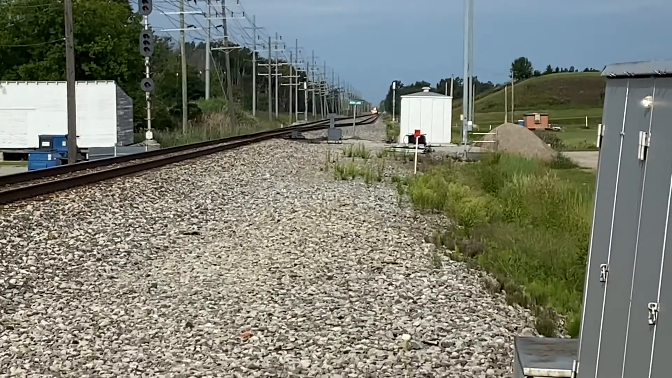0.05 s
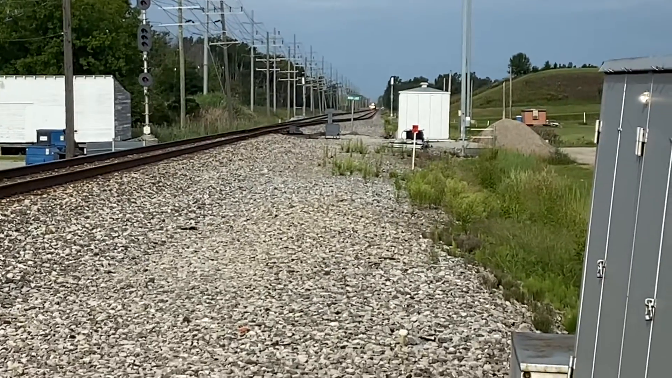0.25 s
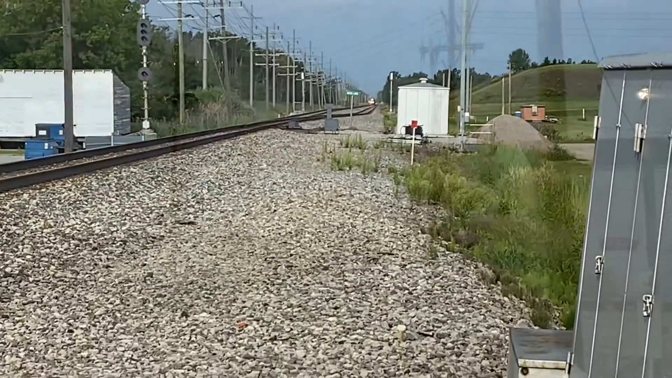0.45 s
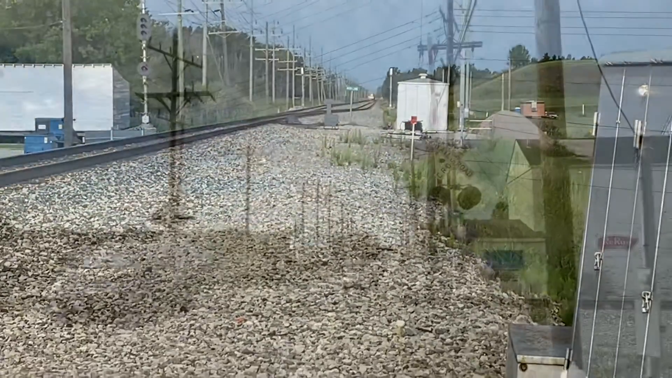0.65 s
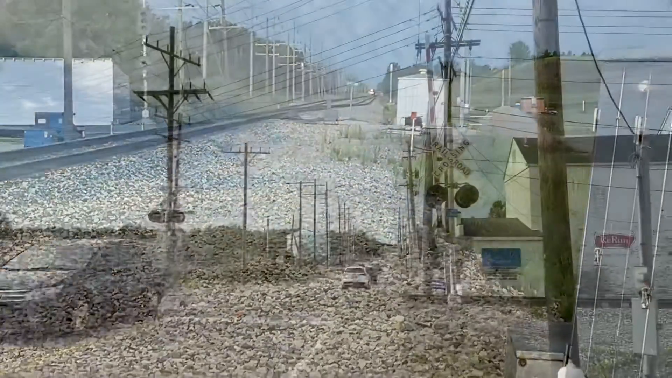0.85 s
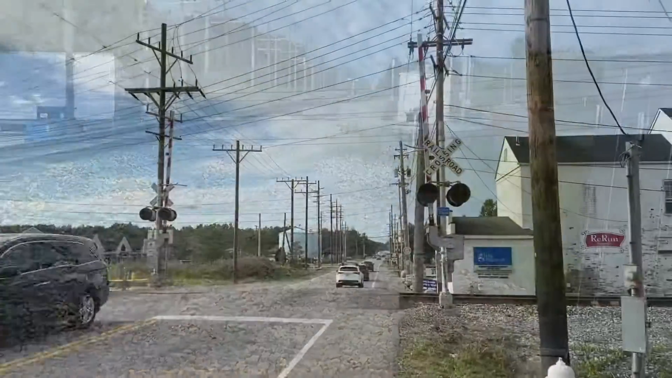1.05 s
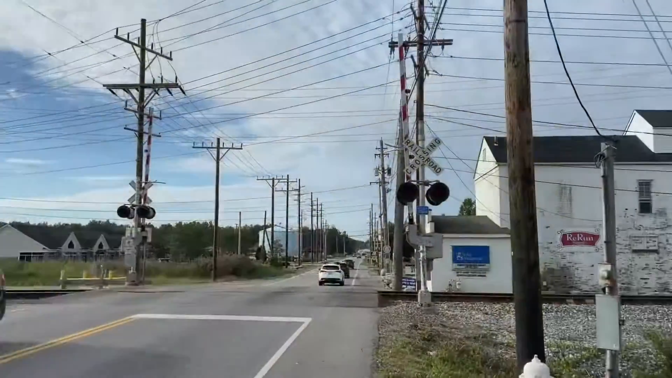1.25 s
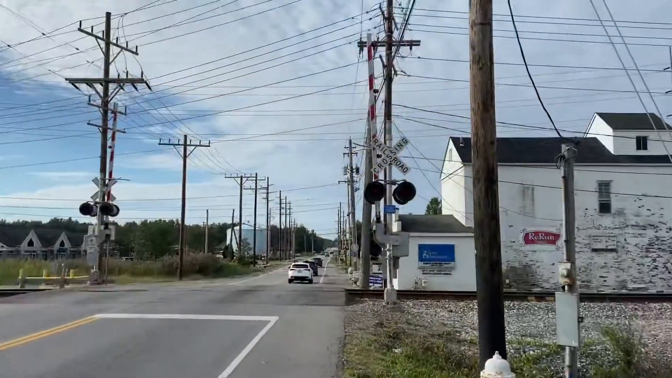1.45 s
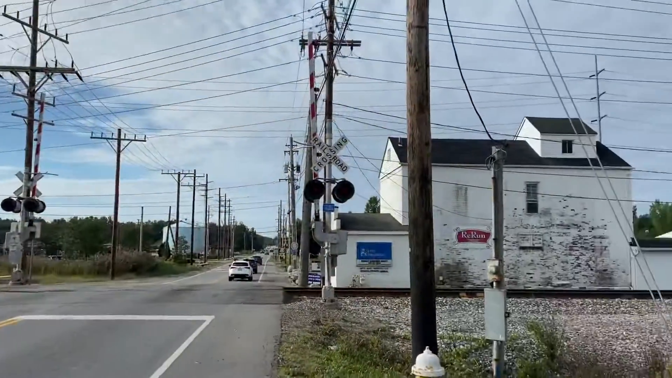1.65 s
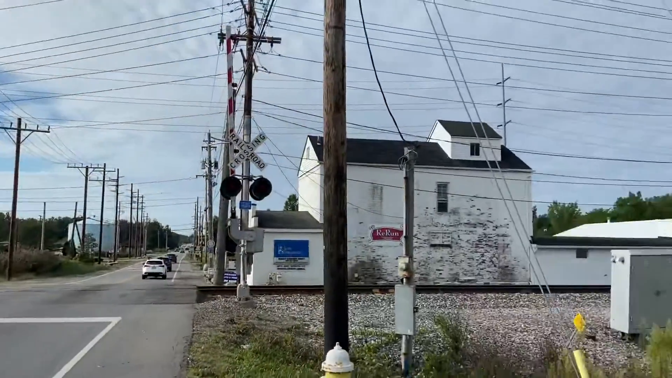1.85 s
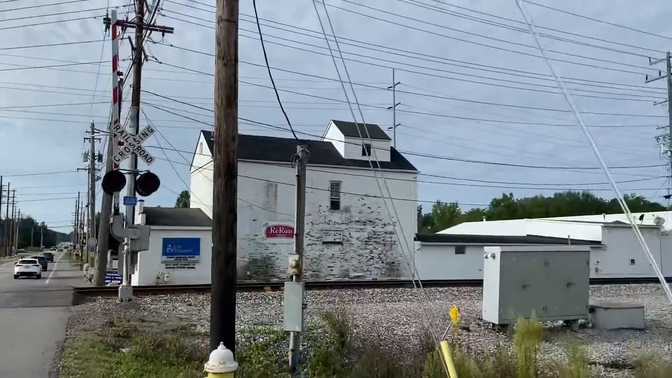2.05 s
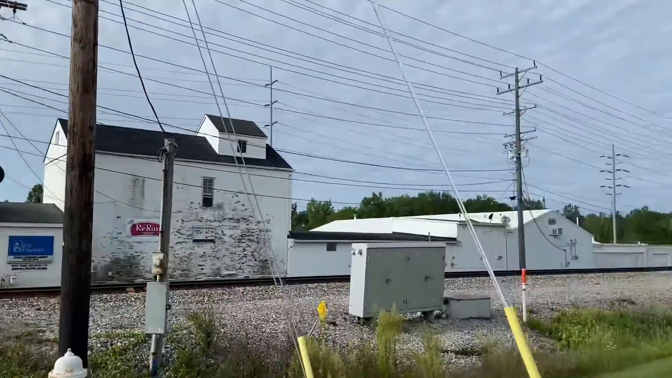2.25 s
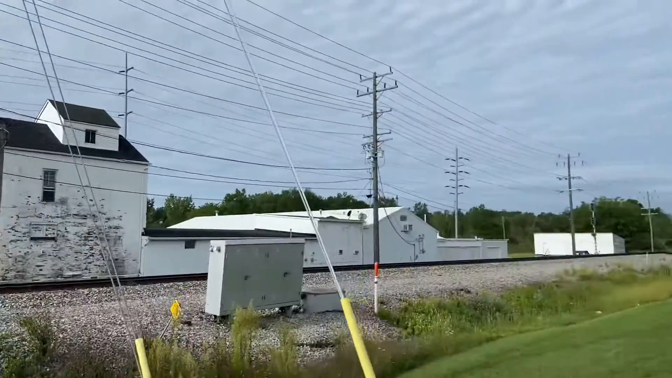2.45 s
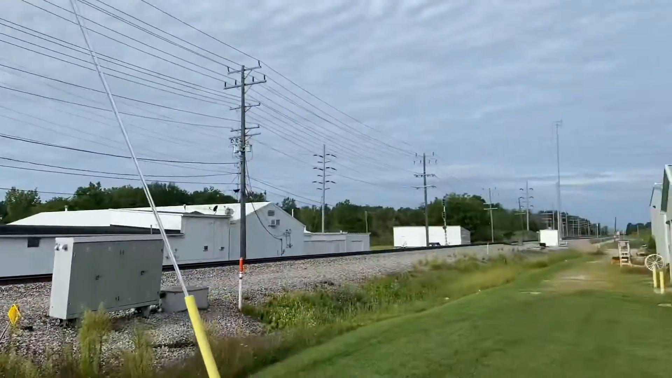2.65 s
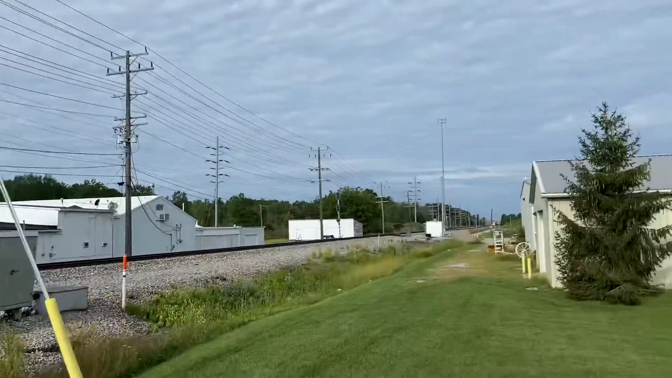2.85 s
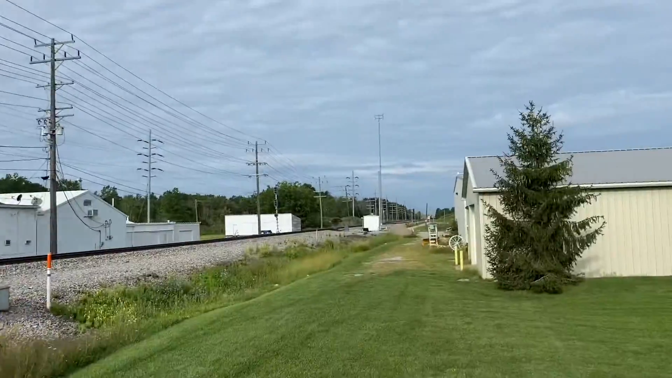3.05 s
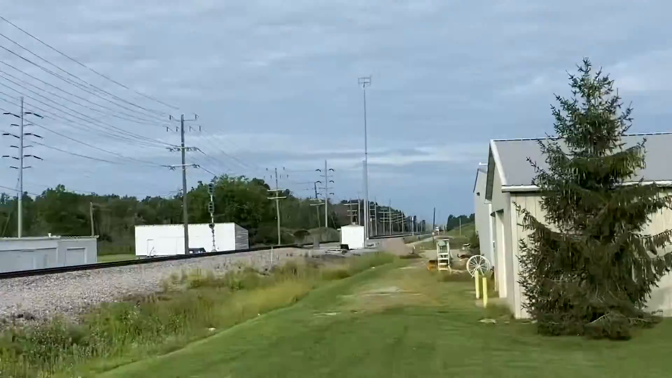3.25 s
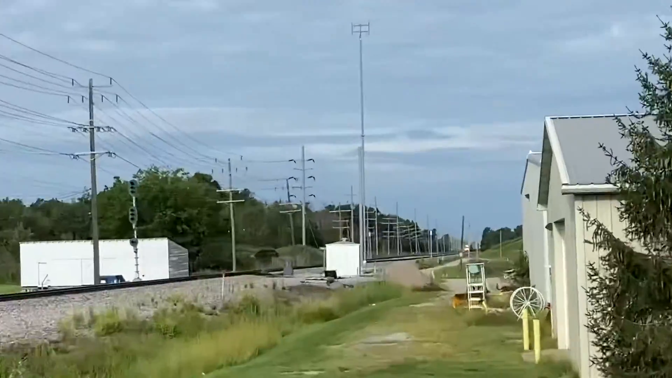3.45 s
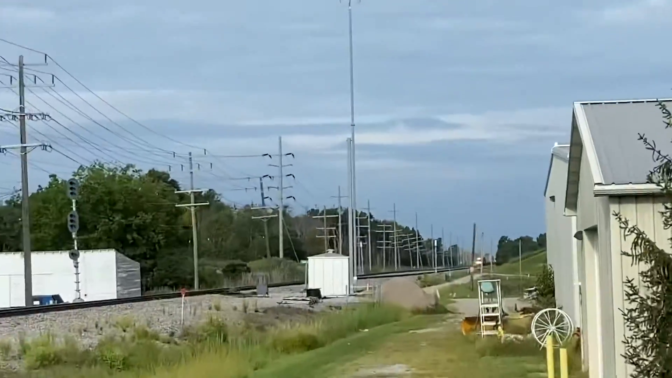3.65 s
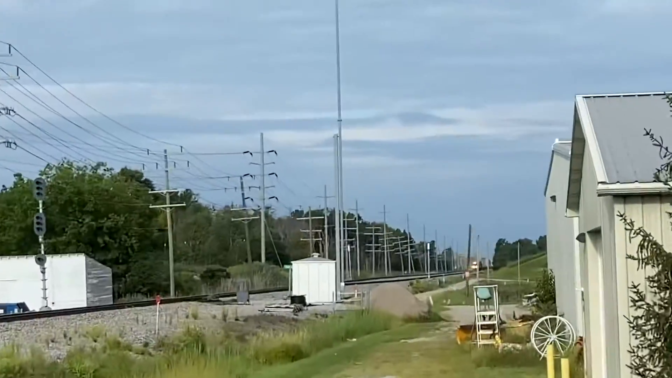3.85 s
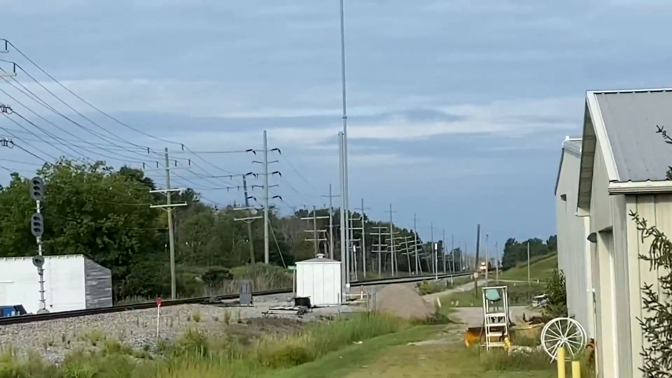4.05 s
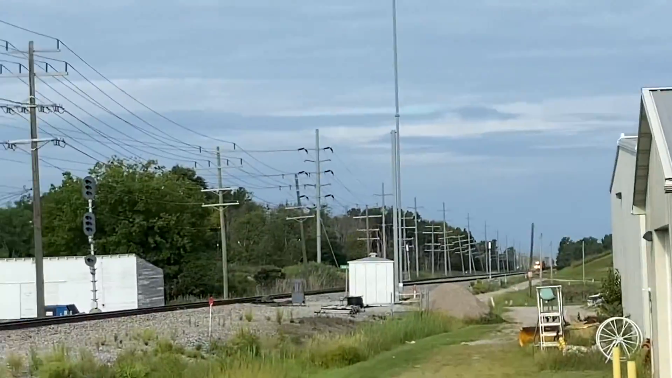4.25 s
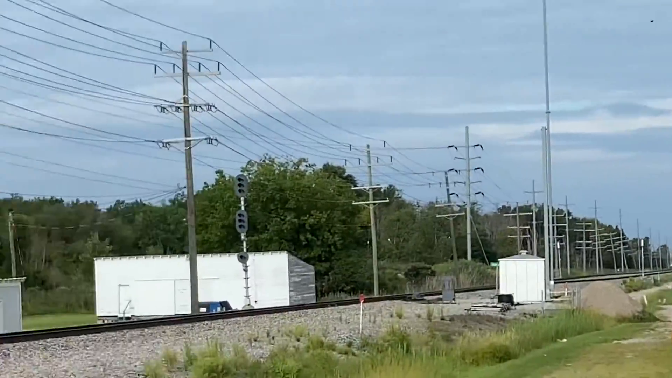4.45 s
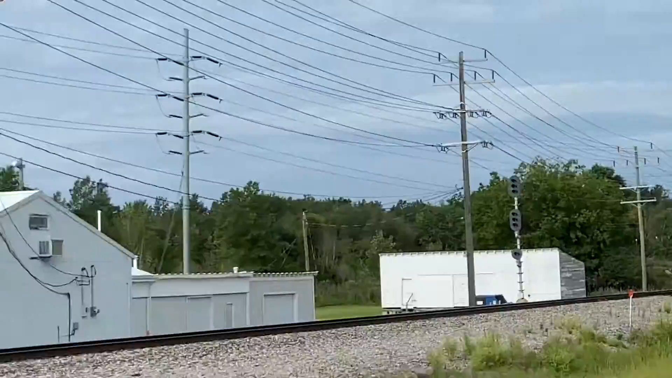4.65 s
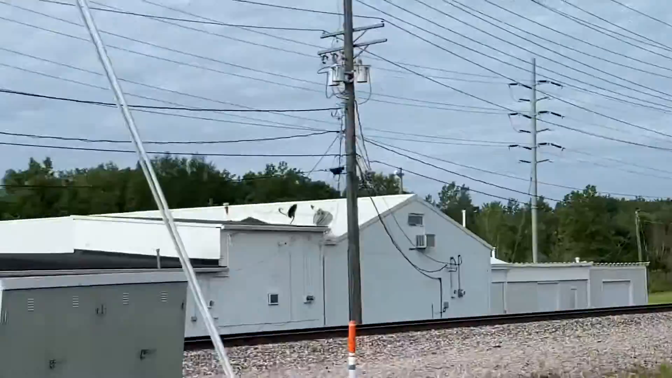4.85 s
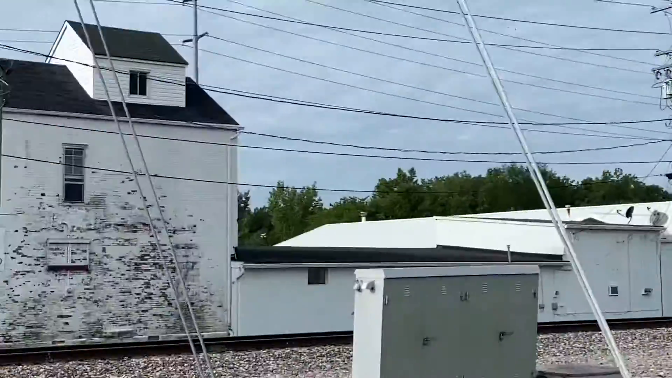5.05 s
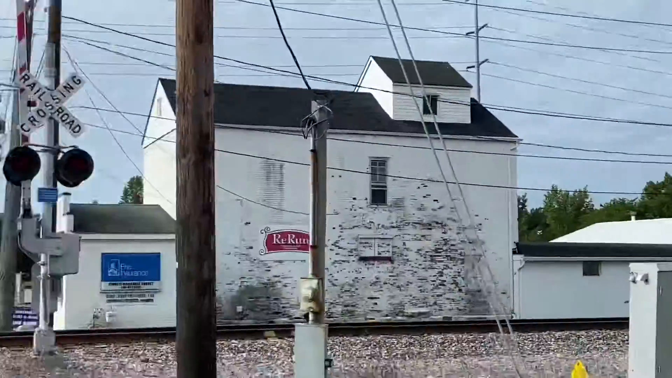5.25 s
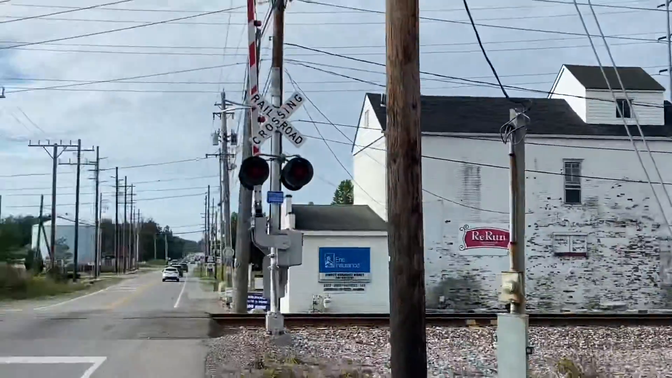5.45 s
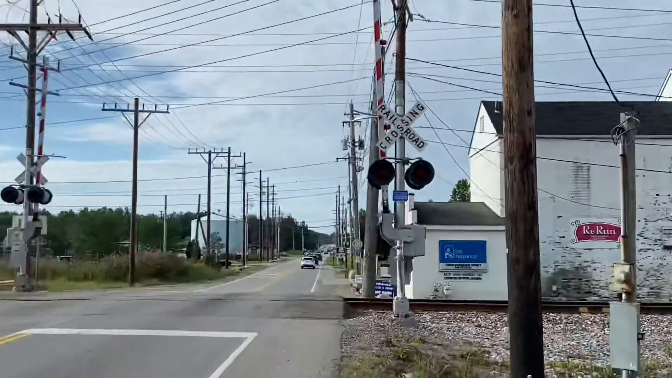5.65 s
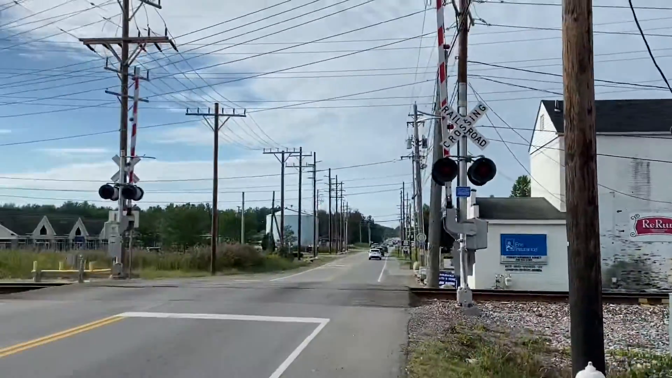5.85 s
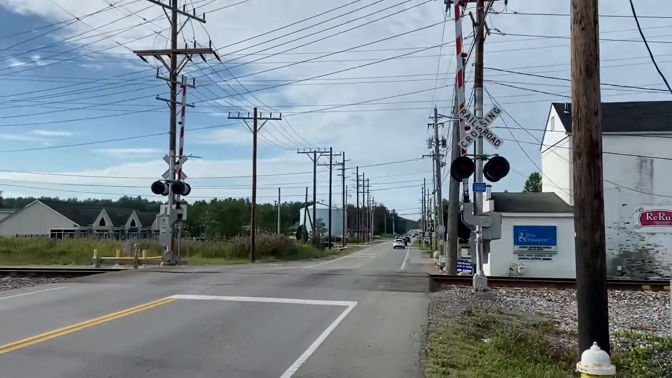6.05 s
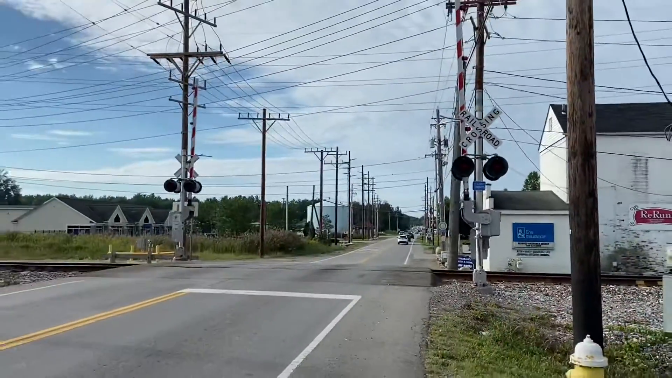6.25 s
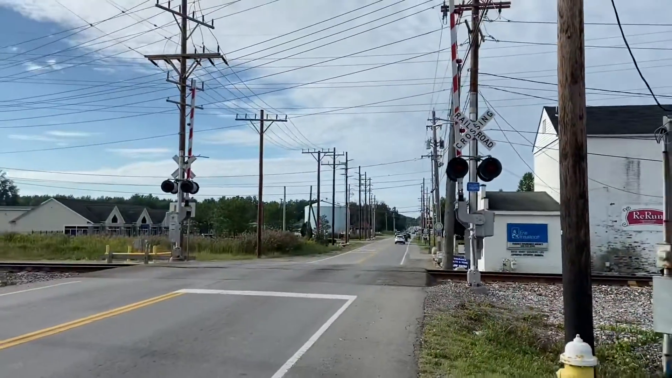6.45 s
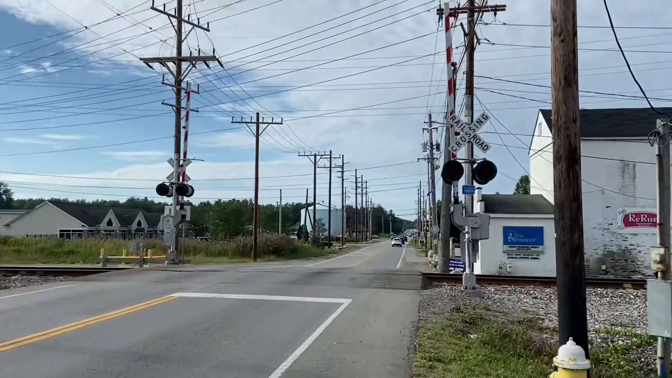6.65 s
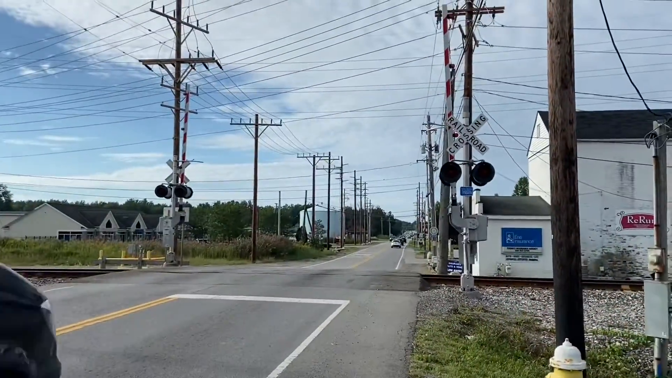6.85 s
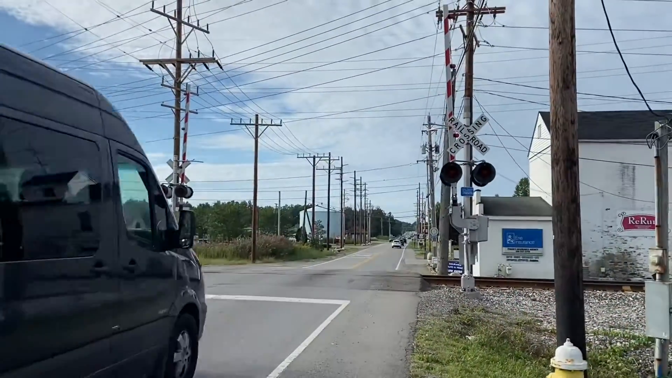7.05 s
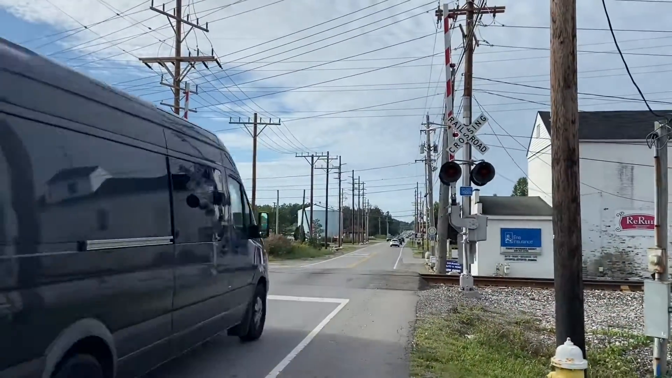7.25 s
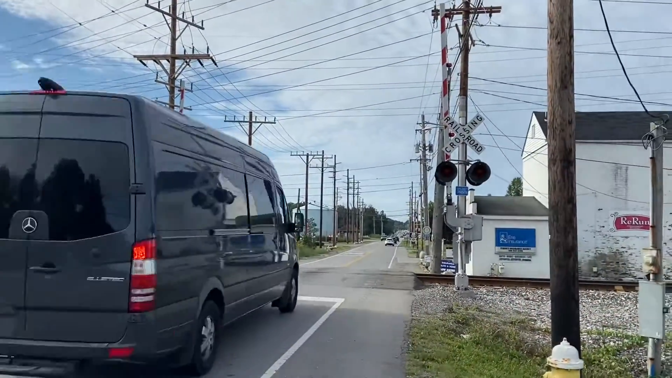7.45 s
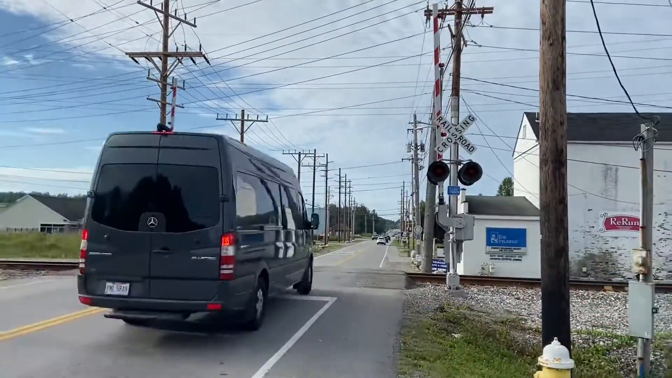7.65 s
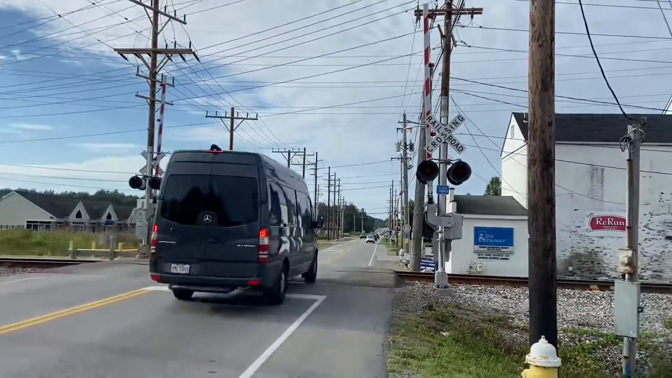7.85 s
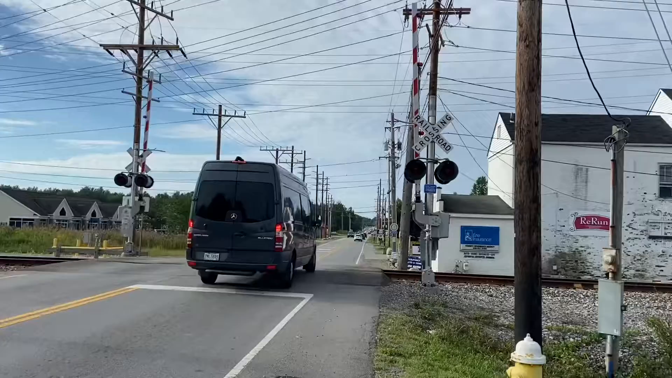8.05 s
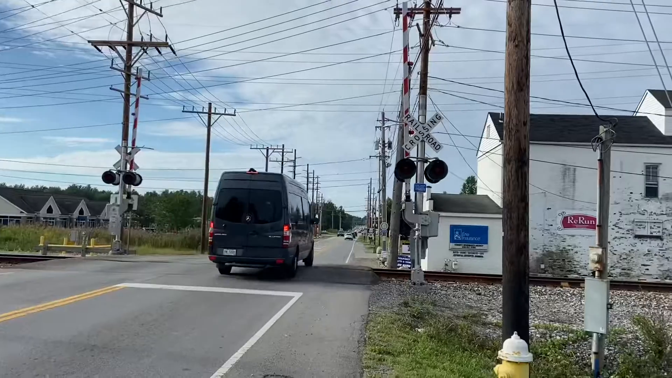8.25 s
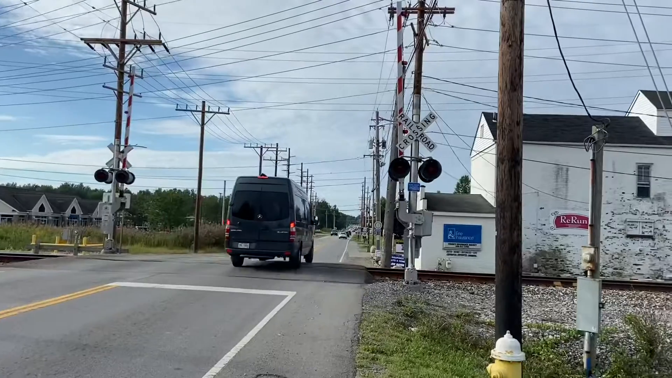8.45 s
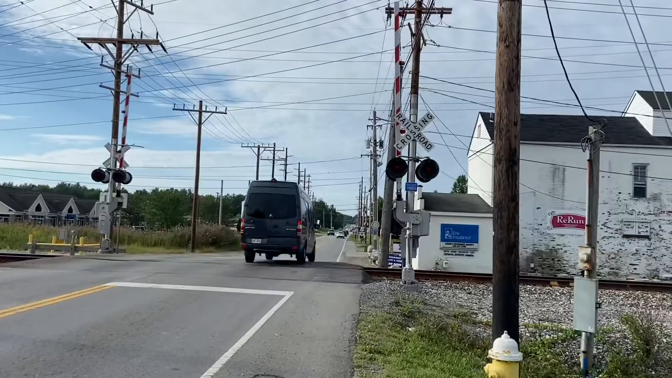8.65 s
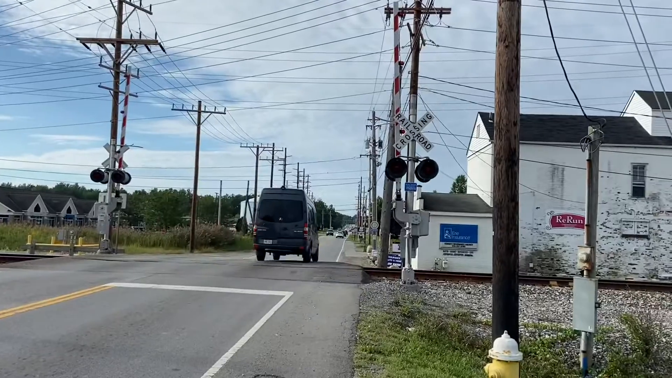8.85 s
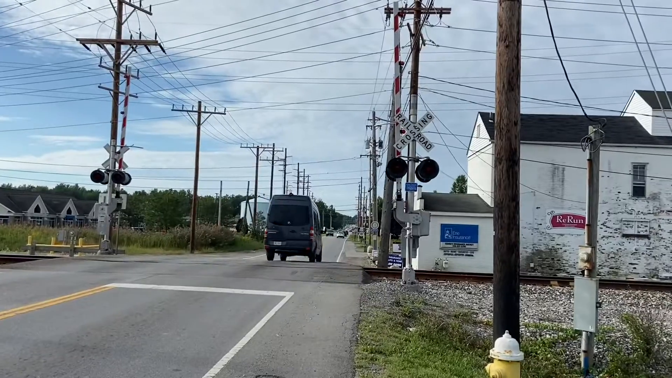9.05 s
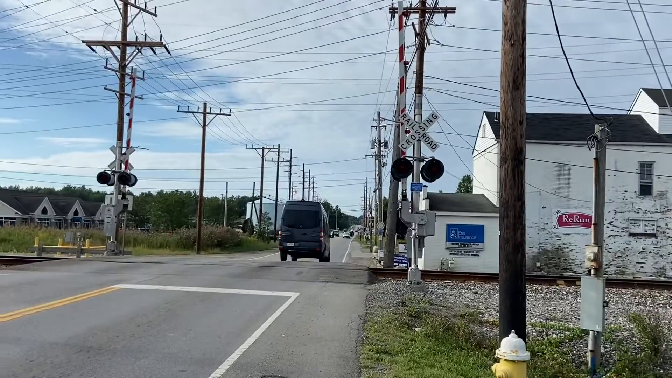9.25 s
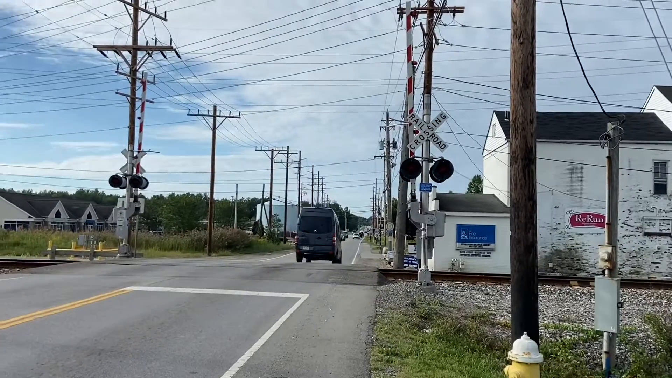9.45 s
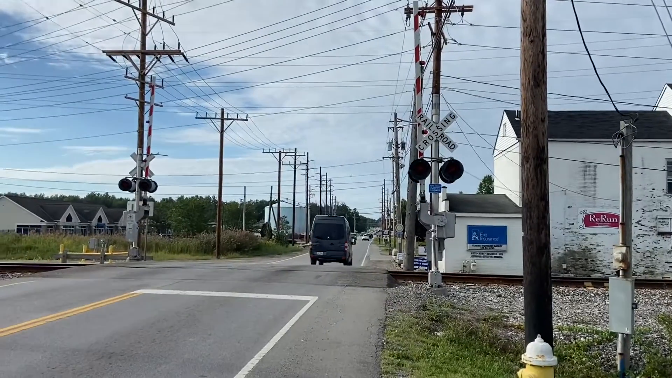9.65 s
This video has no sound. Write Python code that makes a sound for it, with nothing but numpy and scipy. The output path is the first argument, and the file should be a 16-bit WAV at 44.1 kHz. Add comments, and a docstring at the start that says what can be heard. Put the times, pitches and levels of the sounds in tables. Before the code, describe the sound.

Open roadside at a railway level crossing, heard through a hand-held stereo phone. In the first 0.5 s, short low wind puffs thud on the microphone over a bright fluttering grass hiss that soon dies. A car's tyre roar and low engine hum pass nearest around 1.5 s, with grit pops at 1.3, then fade. Distant traffic washes softly beneath. A bush cricket rasps from 2.2 to 3.3 s, louder on the left; a brief rough scuff comes near 2.8. Thin crickets chirp from 3.9 to 6.3 s, with a small stone knock at 4.5. A van's tread hum grows, roaring closest at 6.8 s with hard stone snaps; a wind puff and metallic clinks follow near 7.2. Its axles hit the rails at 8.2-8.4 and, harder, 8.6-8.8 s, with hollow panel thumps, rattling chassis and clinks. Faint crickets return as another car approaches toward the end.

```python
"""Beside a railway level crossing, a car and then a van roll past a hand-held phone; another car nears. Tyres
are coloured noise that sweeps across the two microphone ports; engines are low humming tones. The van's two
axles thump over both rails, ringing the panels and shaking loose metal. Around them: distant traffic, a gust on
the microphone, a bright hiss at the start, insects, a scuff, grit and stones."""
import sys
import numpy as np
from scipy import signal
from scipy.fft import rfft, irfft
from scipy.io import wavfile
from scipy.ndimage import uniform_filter1d, map_coordinates

SR = 44100
rng = np.random.default_rng(int(sys.argv[2]) if len(sys.argv) > 2 else 0)


def unload_audio(sound):
    """Save the sound as a 16-bit wav file, at the path given as the first command line argument."""
    columns = np.transpose(np.atleast_2d(sound))
    # keep every value between -1 and 1, then stretch to whole-number steps
    steps = np.round(np.clip(columns, -1, 1) * 32767)
    wavfile.write(sys.argv[1], SR, steps.astype(np.int16))


N = 428211
FRAME = 1024  # samples in one short spectrum; neighbours overlap by half
HOP = FRAME // 2
TIME = np.arange(N) / SR
HZ = np.maximum(np.fft.rfftfreq(FRAME, 1 / SR), 1)[:, None]
FRAME_S = np.arange(N // HOP + 2) * HOP / SR


def undb(db):
    """Turn decibels into gain."""
    return np.exp(np.asarray(db) * (np.log(10) / 20))


def curves(table, t):
    """Join the columns of a table by straight lines in time."""
    s, *columns = np.transpose(table)
    return [np.interp(t, s, c) for c in columns]


def across(table, hz):
    """Read a (pitch, value) table on a log-frequency axis."""
    f, value = np.transpose(table)
    return np.interp(np.log(hz), np.log(f), value)


def grain(shape):
    """White noise as short spectra: frequency by time."""
    return rng.standard_normal((shape[0], 2 * shape[1]), dtype=np.float32).view(np.complex64)


def sound(spectra):
    """Overlap short spectra into a waveform whose power is the sum of the squared bin gains."""
    window = np.sin(np.pi * (np.arange(FRAME) + .5) / FRAME)
    frames = irfft(spectra.T, FRAME) * (window * FRAME / 2)
    return (frames[:-1, HOP:] + frames[1:, :HOP]).ravel()[:N]


def noise(tone, size):
    """Noise of a given colour, rms 1."""
    colour = undb(across(tone, np.fft.rfftfreq(size, 1 / SR) + 1))
    x = irfft(rfft(rng.standard_normal(size)) * colour, size)
    return x / x.std()


def ring(hz, width, t60, snap=0, top_hz=15000):
    """A snap and a dying noise burst through one resonance with a soft top; width in octaves, peak 1."""
    size, lead = 2 ** 13, 2 ** 7
    dying = rng.standard_normal(size - lead) * undb(-60 * TIME[:size - lead] / t60)
    burst = np.r_[np.zeros(lead), dying]
    burst[lead] += snap
    f = np.fft.rfftfreq(size, 1 / SR) + 1
    quality = 1 / (width * np.log(2))
    soft = (1 + 1j * f / top_hz) ** 4
    resonance = (1 + 1j * quality * (f / hz - hz / f)) ** 2
    x = irfft(rfft(burst) / soft / resonance, size)[lead:]
    return x / np.abs(x).max()


def walk(rate):
    """A smooth random curve with a spread near 1, taking about this many new values per second."""
    k = max(int(SR / rate), 2)
    steps = np.repeat(rng.standard_normal(N // k + 1), k)
    return 1.224 * uniform_filter1d(steps, k)[:N]


def add(out, s, x):
    """Mix a sound in at a time in seconds."""
    i = int(s * SR)
    out[..., i:i + x.shape[-1]] += x[..., :N - i]


def swells(table, tone):
    """Bell-shaped bursts of coloured noise."""
    out, t = np.zeros(N), TIME[:SR]
    for s, db, length in table:
        start = max(s - .5, 0)
        bell = np.exp(-.5 * np.minimum(((start + t - s) / length) ** 2, 10 ** 2))
        add(out, start, noise(tone, len(t)) * undb(db) * bell)
    return out


def ports(gain, likeness, phase, pan_db):
    """Noise at two ports: a shared part shifted in phase between them, and a scattered part for each."""
    c = np.clip(likeness, 0, 1)
    shared, own, phase = np.float32(np.sqrt(c)), np.float32(np.sqrt(1 - c)), np.float32(phase)
    direct = shared * grain(gain.shape)
    left = direct * (np.cos(phase) + 1j * np.sin(phase)) + own * grain(gain.shape)
    right = direct + own * grain(gain.shape)
    left_share = 1 / (1 + undb(-2 * pan_db))  # of the total power
    left_gain = np.float32(gain * np.sqrt(2 * left_share))
    right_gain = np.float32(gain * np.sqrt(2 - 2 * left_share))
    return np.array([sound(left * left_gain), sound(right * right_gain)])


def tyre_gain(rumble, roar, hiss, tone):
    """Carcass rumble, tread roar and air hiss share one colour and blend into each other."""
    colour = undb(across(tone, HZ))
    bands = [(130, 400), (500, 1500), (2500, 7000)]  # Hz
    low, mid, high = (10 * np.log10(np.sum(colour[(HZ > a) & (HZ < b)] ** 2)) for a, b in bands)
    below = across([(300, 0.92), (650, 0.02)], HZ)
    above = across([(1300, 0.013), (2900, 1.0)], HZ)
    between = 1 - below - above
    return colour * undb(below * (rumble - low) + above * (hiss - high) + between * (roar - mid))


# how strongly and how finely tyre noise shifts in colour with the patches of road
FLICKER_DB, FLICKER_PER_S, FLICKER_PER_OCTAVE = 0.9, 8, 5


def flicker():
    """Gains that let each narrow band swell and sink on its own, frequency by time."""
    place = np.broadcast_arrays(np.log2(HZ) * FLICKER_PER_OCTAVE, FRAME_S * FLICKER_PER_S)
    chance = rng.standard_normal(size=(64, 128))
    return undb(FLICKER_DB * map_coordinates(chance, place, order=1, mode="mirror"))


# parts of the engine hum: (multiple of the firing pitch [ratio], level [dB])
ENGINE_ORDERS = [(.5, -9), (1, 1), (1.5, -21), (2, -14.5), (2.5, -20), (3, -15.5)]


def engine(hz, level_db, waver=0.00786):
    """The firing of the cylinders hums at multiples of one pitch, each a little unsteady."""
    turn = 2 * np.pi * np.cumsum(hz * (1 + waver * walk(14))) / SR
    hum = sum(undb(d + 2.6 * walk(9)) * np.sin(np.float32(k * turn)) for k, d in ENGINE_ORDERS)
    return undb(level_db) * hum


# colour of the distant traffic: (pitch [Hz], level [dB])
FAR_TONE = [(22, -17), (55, 4.5), (120, -5), (250, -9), (480, -10), (620, -10.5), (850, -4.5), (1100, -7),
            (1450, -4.5), (2100, -13.5), (3000, -20), (5500, -31), (7400, -31.5), (10000, -76.5)]
# how alike it is at the two ports: (pitch [Hz], likeness [0-1])
FAR_LIKENESS = [(60, 1), (250, 0.63), (600, 0.22), (1400, 0.57), (2400, 0.57), (4000, 1), (12000, 0.62)]
# its balance: (pitch [Hz], left minus right [dB])
FAR_BALANCE = [(100, -0.5), (800, -0.5), (1100, -5.5), (1400, -9.5), (2000, -2), (3500, 1)]
# its phase: (pitch [Hz], lead of the left port [radians])
FAR_PHASE = [(200, 0), (450, -.5), (800, -3), (1400, -2.5), (1900, -1), (2600, 0.5), (3800, 0.74)]
# its level as the phone turns: (time [s], roar [dB], treble [dB])
FAR_LEVEL = [(.4, -36.5, -50.5), (2.2, -47.5, -53), (2.7, -35.5, -53.5), (4.6, -36.5, -52.5),
             (5.3, -33, -56), (6.1, -33.5, -51), (7, -44, -41), (9.0, -48, -55), (9.7, -34, -50.5)]
# distant hiss swelling: (time [s], level [dB], length [s])
FAR_HISSES = [(3.1, -53, 0.5), (4.5, -51, 0.17), (4.85, -54, 0.15)]
# colour of that hiss: (pitch [Hz], level [dB])
FAR_HISS_TONE = [(1200, -25), (2100, 3), (2650, -0.5), (3100, -3), (3700, -23), (8000, -38.5)]
FAR_RUMBLE_DB = -45
# a distant engine slowly easing off
FAR_ENGINE_HZ, FAR_ENGINE_SAG_HZ_PER_S, FAR_ENGINE_DB = 92.1, 1.5, -46.5


def traffic():
    """Many far tyres blur into a wash that swells and sinks, over hisses and one droning engine."""
    roar_db, treble_db = curves(FAR_LEVEL, FRAME_S)
    gain = tyre_gain(FAR_RUMBLE_DB, roar_db, treble_db, FAR_TONE) * flicker()
    wash = ports(gain, across(FAR_LIKENESS, HZ), across(FAR_PHASE, HZ), across(FAR_BALANCE, HZ))
    wash *= undb(0.7 * walk(7))
    drone = engine(FAR_ENGINE_HZ - FAR_ENGINE_SAG_HZ_PER_S * TIME, FAR_ENGINE_DB)
    return wash + swells(FAR_HISSES, FAR_HISS_TONE) + drone


# wind on the microphone: (time [s], level [dB], length [s])
GUSTS = [(.045, -24.5, 0.011), (.085, -22, 0.0087), (.19, -25, 0.021), (.235, -27, 0.02),
         (.325, -19.5, 0.021), (.38, -20, 0.013), (.48, -36, 0.058), (5.8, -39, 0.072), (6.5, -39, 0.07),
         (7.13, -29, 0.051), (9.6, -45, .07)]
# colour of the wind: (pitch [Hz], level [dB])
GUST_TONE = [(20, -28), (40, -9.5), (62, 2.5), (100, -9), (170, -17.5), (400, -47), (1500, -75),
             (8000, -120)]


def wind():
    """Puffs of air buffet the microphone: short bursts of low noise, the same at both ports."""
    return swells(GUSTS, GUST_TONE)


# colour of the bright hiss in the opening half-second: (pitch [Hz], level [dB])
BRIGHT_HISS_TONE = [(900, -25), (1700, 1), (2500, 7), (3400, -31), (7000, -54), (11000, -20), (15000, -38)]
BRIGHT_HISS_DB, BRIGHT_HISS_HOLD_S, BRIGHT_HISS_FADE_DB_PER_S = -45.5, 0.48, 24


def bright_hiss(flutter_db):
    """A bright, fluttering hiss holds at the start, then fades away."""
    t = TIME[:2 * SR]
    fade_db = BRIGHT_HISS_FADE_DB_PER_S * np.maximum(t - BRIGHT_HISS_HOLD_S, 0)
    level_db = BRIGHT_HISS_DB - fade_db + flutter_db * walk(25)[:len(t)]
    out = np.zeros((2, N))
    add(out, 0, np.array([noise(BRIGHT_HISS_TONE, len(t)) for _ in range(2)]) * undb(level_db))
    return out


# one rasp of a bush cricket
RASP_START_S, RASP_ATTACK_S, RASP_STOP_S, RASP_RELEASE_S, RASP_DB = 2.24, 0.52, 3.27, 0.062, -51


def bush_cricket(hz, width, pan_db):
    """A high band of noise, louder on the left, swells as a rasp and stops short; width in Hz."""
    rise = np.clip((FRAME_S - RASP_START_S) / RASP_ATTACK_S, 0, 1)
    stop = np.clip(1 - (FRAME_S - RASP_STOP_S) / RASP_RELEASE_S, 0, 1)
    band = np.exp(-((HZ - hz) / width) ** 2)
    gain = band / np.sqrt(np.sum(band ** 2)) * undb(RASP_DB) * rise * stop
    return ports(gain, 0.11, 0, pan_db) * undb(1.4 * walk(120))


# crickets in the grass; strokes peak about 6 dB above the level:
# (start [s], end [s], pitch [Hz], chirps [per s], pitch sweep in a chirp [share of pitch], level [dB])
CRICKETS = [(3.901, 5.1, 6870, 15, .07, -72), (4.3, 5.2, 7520, 18, .05, -71.5),
            (4.8, 6.0, 7070, 15, .04, -69), (4.85, 6.296, 4830, 48, -.1, -64),
            (8.797, 9.71, 7040, 16.9, .03, -68)]


def crickets(wobble, uneven_db):
    """Each wing stroke gives a short tone that slides in pitch; the strokes differ in strength."""
    out = np.zeros(N)
    unsteady = 1 + wobble * walk(300)
    for start, end, hz, rate, sweep, db in CRICKETS:
        t = np.arange(int((end - start) * SR)) / SR
        stroke = t * rate % 1
        sliding_hz = hz * (1 + sweep * (stroke - .5)) * unsteady[:len(t)]
        turn = 2 * np.pi * np.cumsum(sliding_hz) / SR
        fade = np.sqrt(np.abs(np.sin(np.pi * t / (end - start))))
        add(out, start, undb(db) * 2 * fade * np.sin(np.pi * stroke) ** 4 * np.sin(turn))
    return out * undb(uneven_db * walk(23))


# a brief scuff: (time [s], level [dB], length [s])
SCUFFS = [(2.765, -29, 0.025), (2.805, -31.5, 0.045)]
# its colour: (pitch [Hz], level [dB])
SCUFF_TONE = [(60, 6), (250, 0), (700, 5.5), (1300, -6), (2200, -12), (3000, -23), (4100, -11), (5500, -23),
              (8000, -51), (12000, -52)]


def scuff():
    """A brief scrape: two rough bursts of noise, drawn separately for each port."""
    return np.array([swells(SCUFFS, SCUFF_TONE) for _ in range(2)]) * undb(2.7 * walk(150))


# grit popping under tyres and small ticks:
# (time [s], level [dB], pitch [Hz], width [octaves], soft top [Hz], time to fall 60 dB [s])
TICKS = [(1.316, -16, 854, 1, 3500, 0.026), (1.353, -15.5, 780, 1.6, 3200, .04),
         (2.2436, -32.5, 3020, 4, 12000, 0.0044), (2.636, -23, 1000, 2.6, 7000, .005),
         (2.6715, -24, 700, 2.2, 3500, .008), (2.672, -21, 4200, 1.8, 6000, .005),
         (5.346, -23, 900, 0.78, 4440, .014), (8.239, -27, 3500, 2.1, 12000, 0.022)]


def ticks(snap, spread):
    """A snap excites one quickly damped resonance: a dry pop, slightly different at each port."""
    out = np.zeros((2, N))
    for s, db, pitch_hz, width, top_hz, t60 in TICKS:
        mid = ring(pitch_hz, width, t60, snap, top_hz)
        side = ring(pitch_hz, width, t60, top_hz=top_hz)
        add(out, s, np.array([mid + spread * side, mid - spread * side]) * undb(db))
    return out


# stones snapping out from under tyres, far and near:
# (time [s], level [dB], first pitch [Hz], last pitch [Hz], time to fall 60 dB [s],
#  lead of the left port [ms], left minus right [dB], crack level [dB])
STONES = [(2.2436, -17.5, 1900, 350, .018, .05, 1, -25), (4.4812, -20.5, 1000, 420, .026, .05, -2, -45),
          (6.7342, -6, 1200, 950, .011, .2, 3, -26), (6.748, -14.5, 450, 300, .035, .3, 3, -40),
          (6.8113, -6, 1650, 400, .021, .05, -3, -19)]
STONE_SAG_S, STONE_ATTACK_S = 0.0011, 0.0002  # the knock drops in pitch as the tread relaxes
CRACK_HZ, CRACK_OCTAVES, CRACK_T60_S, CRACK_TOP_HZ = 2200, 1.6, .004, 6000


def stones():
    """Each stone gives a crack and one hard knock of a few cycles, falling in pitch."""
    out, t = np.zeros((2, N)), TIME[:SR // 20]
    for s, db, first_hz, last_hz, t60, lead_ms, pan_db, crack_db in STONES:
        hz = last_hz + (first_hz - last_hz) * np.exp(-t / STONE_SAG_S)
        knock = np.sin(2 * np.pi * np.cumsum(hz) / SR) * undb(db - 60 * t / t60)
        knock *= 1 - np.exp(-t / STONE_ATTACK_S)
        crack = ring(CRACK_HZ, CRACK_OCTAVES, CRACK_T60_S, snap=12, top_hz=CRACK_TOP_HZ)[:len(t)]
        knock += undb(crack_db) * crack
        add(out[0], s, knock * undb(pan_db / 2))
        add(out[1], s + lead_ms * 10 ** -3, knock * undb(-pan_db / 2))
    return out


# what tyre and crossing panels ring with: (pitch [Hz], time to fall 60 dB [s], level [dB])
PANEL = [(62, 0.17, -11), (87.6, 0.2, 2.5), (119, 0.17, 1.5), (199, 0.12, -4.5), (249, 0.21, -1.5),
         (365, 0.055, -12), (410, 0.11, -3), (485, 0.065, -0.5), (613, 0.092, -15), (795, 0.06, -9.5),
         (930, 0.054, -4), (1150, .04, -12), (1346, 0.049, 2), (1430, 0.04, -2)]
# a wheel pair hitting the edges of a rail's groove and bouncing;
# front axle on the first and second rail, then rear axle on the first and second rail:
# (time [s], level of all modes together [dB], favoured pitch [Hz], spread [octaves], rattle [dB])
BLOWS = [(8.224, -23, 430, .5, -36), (8.2415, -12, 480, .4, -29), (8.2412, -13.5, 880, .25, -34),
         (8.244, -15, 95.5, .52, -30), (8.255, -17, 230, .37, -34), (8.263, -19, 750, .6, -29),
         (8.280, -20, 110, .6, -40), (8.353, -15.5, 490, .4, -27), (8.363, -19, 250, .52, -28),
         (8.369, -19, 380, .4, -30), (8.373, -19, 1350, .3, -25), (8.381, -17, 700, .6, -26),
         (8.383, -19, 150, .9, -31), (8.398, -20, 1150, .49, -30), (8.404, -14.5, 320, .8, -29),
         (8.44, -17, 130, .9, -35), (8.586, -12, 1170, .4, -26), (8.588, -23, 380, .5, -36),
         (8.6, -8, 510, .3, -24), (8.607, -15, 820, .3, -28), (8.607, -13, 199, .4, -28),
         (8.613, -17, 850, .5, -31), (8.626, -16, 400, .4, -29), (8.63, -18, 150, .9, -34),
         (8.641, -24, 900, .3, -38), (8.658, -17, 120, .9, -35), (8.718, -5.5, 497, .2, -26),
         (8.728, -19, 700, .4, -27), (8.735, -14, 260, .5, -24), (8.737, -13, 700, .7, -22),
         (8.748, -17, 470, .5, -30), (8.745, -11.5, 160, .88, -26), (8.760, -16.5, 860, .3, -31),
         (8.767, -14, 410, .2, -34), (8.780, -18, 150, .8, -36)]
# colour of the rattling chassis: (pitch [Hz], level [dB])
RATTLE_TONE = [(22, -22), (55, 3), (240, 6.5), (480, -1), (900, -4), (1400, -14), (2200, -24),
               (3900, -24.5), (5500, -35), (7500, -37.5), (11000, -49), (15000, -46)]
# loose metal on the van:
# (time [s], peak level [dB], pitch [Hz], width [octaves], time to fall 60 dB [s])
CLINKS = [(7.15, -30, 4400, 0.19, .19), (7.225, -30, 4750, 0.48, 0.26), (8.354, -35, 4600, .4, .1),
          (8.371, -31, 3850, .3, 0.16), (8.383, -35, 2950, 0.21, .08), (8.734, -21, 2650, .6, 0.044),
          (8.739, -26.5, 3650, .2, 0.045), (8.745, -28.5, 3960, .1, 0.081),
          (8.835, -38.5, 4480, 0.39, 0.29)]


def crossing(chatter_db, rattle_t60, echo_db, echo_t60):
    """Each blow rings the panel modes near its pitch and shakes the chassis; buildings return a faint tail."""
    t = TIME[:SR // 3]
    hz, t60, mode_db = np.transpose(PANEL)
    modes = undb(mode_db[:, None] - 60 * t / t60[:, None]) * np.sin(2 * np.pi * hz[:, None] * t)
    out, chatter = np.zeros(N), walk(350)
    for s, db, pitch_hz, spread, rattle_db in BLOWS:
        weight = np.exp(-(np.log2(hz / pitch_hz) / spread) ** 2)
        weight *= undb(db) / np.sum(weight * undb(mode_db))
        shaking_db = chatter_db * chatter[int(s * SR):][:len(t)]
        rattle = noise(RATTLE_TONE, len(t)) * undb(rattle_db - 60 * t / rattle_t60 + shaking_db)
        attack = 1 - np.exp(-t / 0.00019)
        add(out, s, (np.sum(weight[:, None] * modes, axis=0) + rattle) * attack)
    for s, db, pitch_hz, width, decay in CLINKS:
        add(out, s, ring(pitch_hz, width, decay) * undb(db))
    t = TIME[:SR // 2]
    tail = rng.standard_normal((2, len(t))) * undb(-60 * t / echo_t60) * (t > .03)
    tail *= undb(echo_db) / np.sqrt(np.sum(tail[0] ** 2))
    direct = np.array([out, np.roll(out, 1)])  # the crossing lies just left of centre
    return direct + signal.oaconvolve(np.float32(direct), np.float32(tail), axes=1)[:, :N]


SPEED_M_S, SOUND_M_S = 12, 343  # of the vehicles; of sound


def drive_by(t, closest_s, distance_m, coming_db, going_db):
    """Loss in dB from range and roadside screening, and aspect from -1 (coming) to 1 (going)."""
    along = SPEED_M_S * (t - closest_s)
    r = np.hypot(along, distance_m)
    screening_db = np.where(along < 0, coming_db, going_db) * (r - distance_m)
    return 20 * np.log10(r / distance_m) + screening_db, along / r


def horn_db(horn, aspect):
    """The wedge between tyre and road is a horn that aims bands of noise; some glide down as it nears."""
    bearing, ahead = np.degrees(np.arcsin(aspect)), np.maximum(-aspect, 0)
    lift = 0
    for hz, width, rise, db, aim, beam in horn:
        off_pitch = (np.log2(HZ / hz) - rise * ahead) / width
        off_aim = (bearing - aim) / beam
        lift = lift + db * np.exp(-off_pitch ** 2 - off_aim ** 2)
    return lift


BEAM_NARROWNESS = 17.4  # how tightly the tread hum is aimed along the road
TREAD_OCTAVES, TREAD_WANDER_OCTAVES = 0.19, 0.057  # width of the tread hum; its waver in pitch
BLUR_HZ = 4280  # above this, at 1 ms of lead, the four tyres no longer reach the ports alike
EXHAUST_REAR_DB = 2.5  # the exhaust points backwards


def vehicle(row, tone, path, horn, likeness, tread_hz, tread_db, beam_db, cavity_hz, cavity_db,
            rough_db, rumble_fade, hiss_fade, hiss_ahead_db, rumble_rear_db):
    """Tyres sweep past, tread and air cavity hum, asphalt shakes the level, the engine drops in pitch."""
    (closest_s, distance_m, rumble_db, roar_db, hiss_db,
     rear_db, coming_db, going_db, firing_hz, engine_db) = row
    loss, aspect = drive_by(FRAME_S, closest_s, distance_m, coming_db, going_db)
    lead_ms, pan_db = curves(path, FRAME_S)
    # the tread sings in one resonance that has its own strength far ahead
    ahead = np.maximum(-aspect, 0) ** BEAM_NARROWNESS
    wander = TREAD_WANDER_OCTAVES * np.interp(FRAME_S, TIME, walk(12))
    tread_bell = np.exp(-((np.log2(HZ / tread_hz) - wander) / TREAD_OCTAVES) ** 2)
    tread = (tread_db + beam_db * ahead) * tread_bell
    cavity = cavity_db * np.exp(-((HZ - cavity_hz) / 30) ** 2)  # the air inside the tyres hums
    # bass carries further than treble: each fade is a share of the loss with range
    rumble = rumble_db - rumble_fade * loss + rumble_rear_db * aspect
    hiss = hiss_db - hiss_fade * loss - hiss_ahead_db * aspect
    gain = tyre_gain(rumble, roar_db - loss, hiss, tone)
    gain = gain * undb(tread + cavity + horn_db(horn, aspect) + rear_db * aspect)
    phase = 2 * np.pi * HZ * lead_ms * 10 ** -3
    alike = likeness + (1 - likeness) / (1 + (HZ / 250) ** 2)  # long waves reach both ports alike
    # four tyres at different bearings blur the lead for short waves
    alike = alike / (1 + np.square(np.square(HZ * np.sqrt(np.abs(lead_ms)) / BLUR_HZ)))
    shadow_db = pan_db * HZ / (HZ + 200)  # little difference in the bass
    tyres = ports(gain * flicker(), alike, phase, shadow_db) * undb(rough_db * walk(70))
    loss, aspect = drive_by(TIME, closest_s, distance_m, coming_db, going_db)
    doppler = 1 / (1 + aspect * SPEED_M_S / SOUND_M_S)
    motor_db = engine_db - rumble_fade * loss + EXHAUST_REAR_DB * aspect
    return tyres + engine(firing_hz * doppler, motor_db)


# vehicles passing, in rows for the car, the van and the next car, which is still coming:
# (closest at time [s], distance [m], carcass rumble [dB], tread roar [dB], air hiss [dB],
#  louder from behind [dB], screening while coming [dB per m], screening while going [dB per m],
#  firing pitch [Hz], engine [dB])
PASSES = [(1.52, 6.84, -36, -26.5, -43.5, 1.5, 1.52, 1.2, 93, -38),
          (6.8, 3.41, -32.5, -23.5, -39.5, 2, 0.78, -0.13, 87, -49),
          (10.3, 5.4, -44.5, -37.5, -47.5, 5.5, 0.94, 0, 94.4, -31)]
# bearing of the next car: (time [s], lead of the left port [ms], left minus right in the treble [dB])
NEXT_PATH = [(9.201, 0.098, 0.28), (9.701, 0.35, -0.76)]
# bands aimed by its tyre horn: (pitch [Hz], width [octaves], rise in pitch far ahead [octaves],
#  level [dB], bearing [degrees, -90 coming to 90 going], beam width [degrees])
NEXT_HORN = [(1550, .28, 0, 7, -67, 13)]


def next_car():
    """Another car nears: its tyre noise and engine grow as the range shrinks."""
    return vehicle(
        PASSES[2], CAR_TONE, NEXT_PATH, NEXT_HORN, likeness=0.89,
        tread_hz=850, tread_db=-7.0, beam_db=11.0, cavity_hz=215, cavity_db=7.5, rough_db=-0.5,
        rumble_fade=0.56, hiss_fade=0.45, hiss_ahead_db=-3.0, rumble_rear_db=2)


# tyre colour of both cars: (pitch [Hz], level [dB])
CAR_TONE = [(25, -25), (60, -4), (130, -2.5), (220, -1.5), (420, -2), (600, -8.5), (830, -3.5),
            (1100, -7.5), (1600, -8.5), (2800, -18.5), (4500, -20), (7200, -36), (11000, -37.5),
            (15000, -49)]
# bearing of the car: (time [s], lead of the left port [ms], left minus right in the treble [dB])
CAR_PATH = [(.6, 0.069, 0), (1.0, 0.063, 0.5), (1.3, 0.17, 1.5), (1.55, 0.34, 2), (1.85, 0.42, 4),
            (2.2, 0.33, 1), (2.6, 0.2, 5)]
# bands aimed by its tyre horn: (pitch [Hz], width [octaves], rise in pitch far ahead [octaves],
#  level [dB], bearing [degrees, -90 coming to 90 going], beam width [degrees])
CAR_HORN = [(467, 0.31, 0, 3, -6, 41), (1210, 0.32, 0, 3, -45, 20), (2770, 0.23, 0.98, 6.5, -3, 87),
            (1290, 0.53, 0, -2.5, 18, 27), (4670, 0.33, 0, -8, -7, 16)]


def car():
    """The first car rolls past; its tread hum is weaker from far ahead."""
    return vehicle(
        PASSES[0], CAR_TONE, CAR_PATH, CAR_HORN, likeness=0.67,
        tread_hz=807, tread_db=3.5, beam_db=-26, cavity_hz=215, cavity_db=3.0, rough_db=0.86,
        rumble_fade=0.92, hiss_fade=1.44, hiss_ahead_db=4.5, rumble_rear_db=-4.0)


# tyre colour of the van: (pitch [Hz], level [dB])
VAN_TONE = [(22, -10), (45, 0), (130, -7), (250, -1.5), (350, -7), (550, -6), (830, -2.3), (1150, -4.5),
            (1900, -7.5), (3000, -16.5), (4800, -22), (7200, -64.5), (11000, -32.5), (15000, -51)]
# bearing of the van: (time [s], lead of the left port [ms], left minus right in the treble [dB])
VAN_PATH = [(5.7, 0.023, 3), (6.05, 0.27, -7.5), (6.7, 0.35, 2), (7.0, 0.21, 8.5), (7.25, 0.026, 2.5),
            (7.6, 0.017, 0), (8.8, 0.11, 1.5)]
# bands aimed by its tyre horn: (pitch [Hz], width [octaves], rise in pitch far ahead [octaves],
#  level [dB], bearing [degrees, -90 coming to 90 going], beam width [degrees])
VAN_HORN = [(614, 0.3, 0, 6, 30, 30), (1680, .25, 0, 9, -65, 17), (2630, 0.28, 0.0069, 4, -18, 22),
            (3600, 0.2, 0.0038, 2.5, -19, 36), (1150, 0.37, 0, -2.5, -3, 40),
            (4000, .2, 0.0079, -12, -78, 12)]


def van():
    """The van passes closest; its tread hum is stronger from far ahead."""
    return vehicle(
        PASSES[1], VAN_TONE, VAN_PATH, VAN_HORN, likeness=0.88,
        tread_hz=832, tread_db=2.5, beam_db=21.5, cavity_hz=258, cavity_db=2.5, rough_db=0.5,
        rumble_fade=0.76, hiss_fade=1.0, hiss_ahead_db=0.0, rumble_rear_db=0.5)


def scene():
    """Surroundings, crossing and road at the two ports."""
    air = traffic() + wind() + bright_hiss(flutter_db=2.0)
    insects = bush_cricket(hz=5100, width=1760, pan_db=6.5) + crickets(wobble=0.014, uneven_db=1)
    grit = scuff() + ticks(snap=16.0, spread=0.59) + stones()
    thumps = crossing(chatter_db=4, rattle_t60=0.17, echo_db=-28.0, echo_t60=0.3)
    return air + insects + grit + thumps + next_car() + car() + van()


TOP_HZ = 15600


def record(dry):
    """The phone drops the deepest bass and cuts the top."""
    x = signal.sosfilt(signal.butter(4, 38, "high", fs=SR, output="sos"), dry)
    return signal.sosfilt(signal.ellip(8, .2, 70, TOP_HZ, fs=SR, output="sos"), x)


dry = scene()
out = record(dry)
unload_audio(out)
```